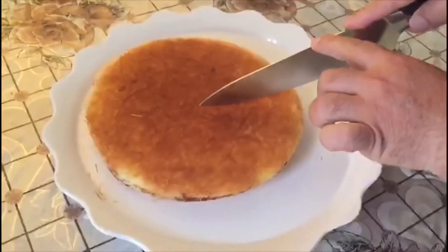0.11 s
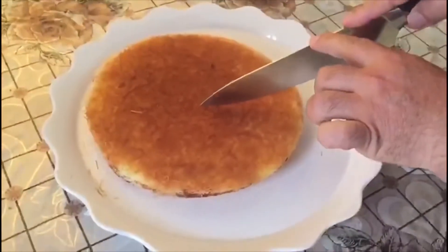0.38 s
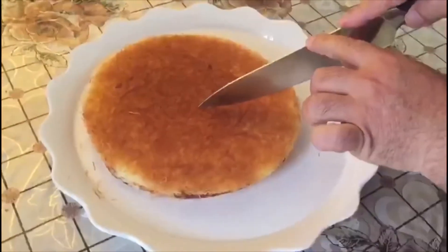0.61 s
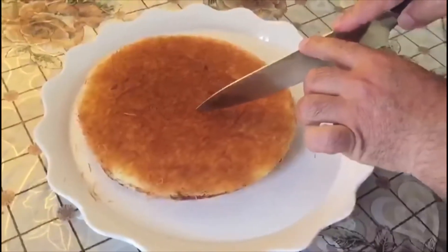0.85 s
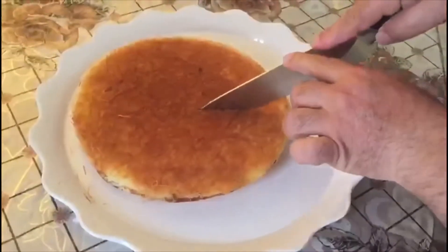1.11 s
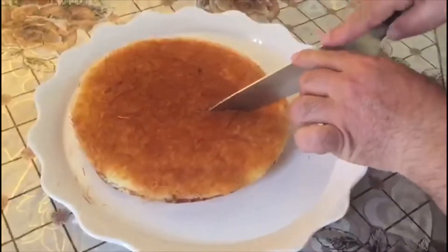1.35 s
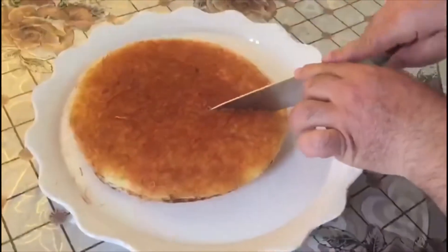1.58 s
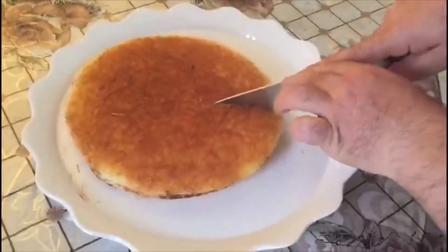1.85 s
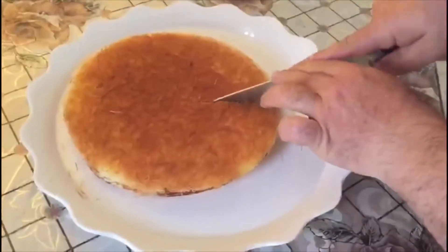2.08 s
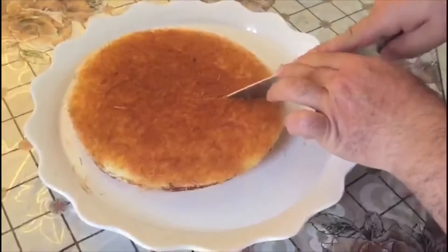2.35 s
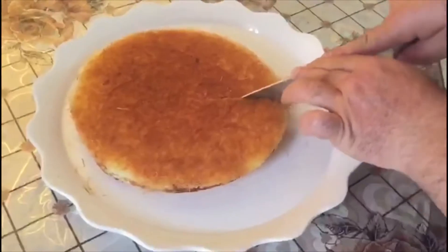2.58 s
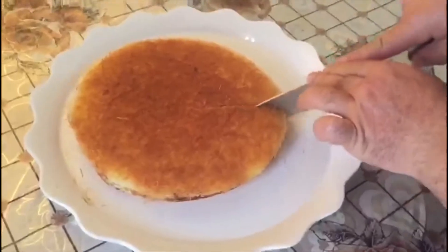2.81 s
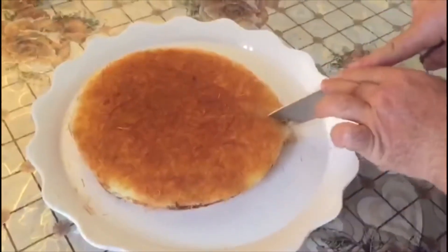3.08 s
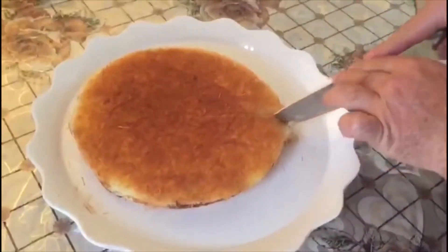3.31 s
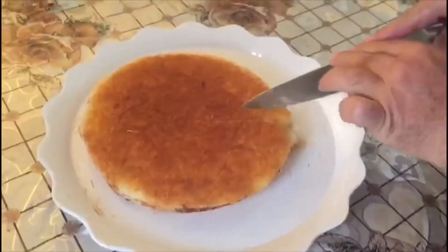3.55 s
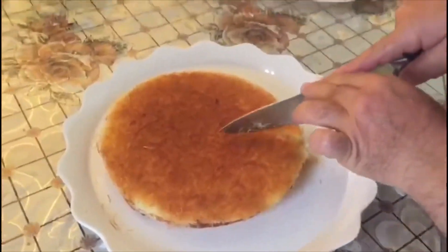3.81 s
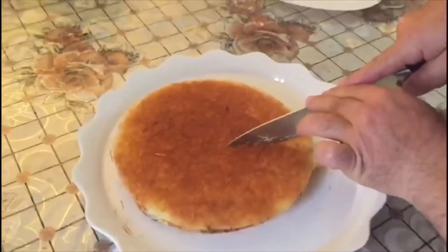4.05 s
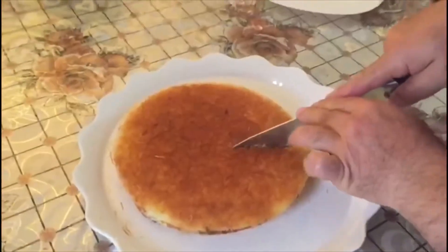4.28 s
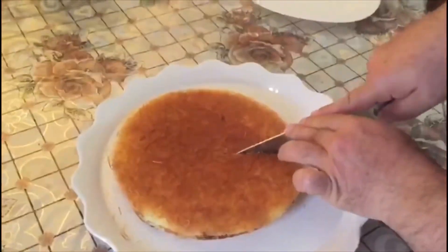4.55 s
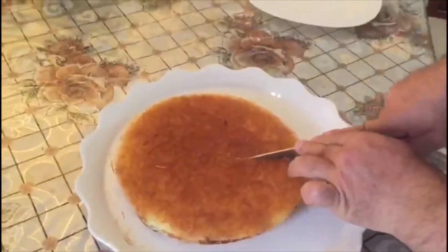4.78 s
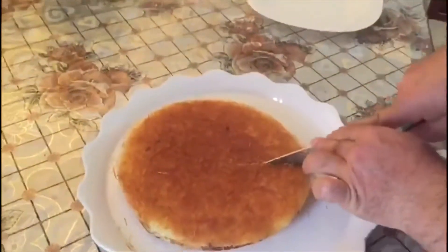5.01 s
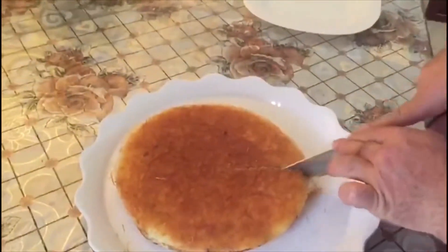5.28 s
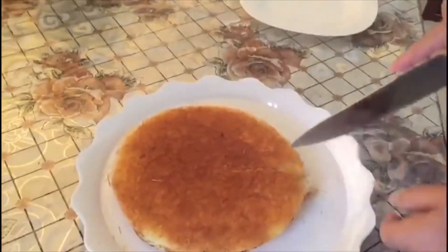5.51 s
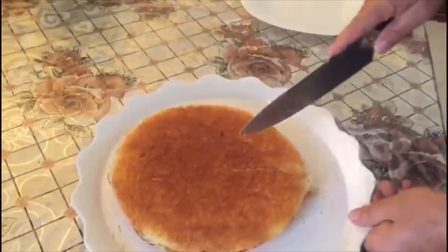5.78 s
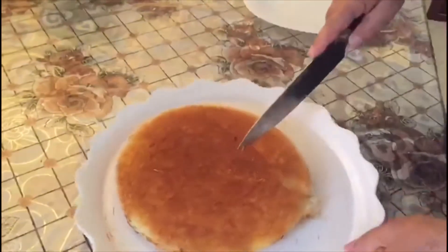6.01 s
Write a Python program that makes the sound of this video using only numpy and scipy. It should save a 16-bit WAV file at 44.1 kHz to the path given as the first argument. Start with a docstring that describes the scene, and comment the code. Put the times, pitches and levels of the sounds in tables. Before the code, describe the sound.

A phone held near a plate picks up a blade sawing brittle baked crust: sharp snaps first, then denser crunches, muffled as the blade sinks. A hard plate strike midway leads into scraping and heavy low bumps. It quiets, steel tinkles briefly, a stronger plate strike rings shortly in the room, sparse clicks follow, and the plate rubs across the tablecloth over faint air and low rumble.

```python
"""A crisp crust crackles and rings the blade as a kitchen knife saws through it on a ceramic plate.
Place: a quiet room with air noise, low rumble, a fading drone and a faint tone. Microphone: a phone, close by.
Noise bursts of fracture excite crust, blade, crumb and plate; light touches ring the free blade's modes.
The edge twice strikes the plate hard, as damped modes with wall echoes and a diffuse room tail.
The plate shifts, thuds and slides on the table, as shaped noise and short gliding tones."""
import sys
import numpy as np
from scipy import signal
from scipy.fft import rfft, irfft, next_fast_len
from scipy.io import wavfile
from scipy.ndimage import uniform_filter1d, map_coordinates

SR = 44100
rng = np.random.default_rng(int(sys.argv[2]) if len(sys.argv) > 2 else 0)


def master(y):
    """Save y as 16-bit WAV."""
    cut = np.clip(np.atleast_2d(y).T, -1, 1)
    pcm = np.round(cut * 32767)  # scale
    wavfile.write(sys.argv[1], SR, pcm.astype(np.int16))


def linear_from_db(decibels):
    """Turn decibels (scalar or array-like) into linear amplitude factors; 0 gives 1."""
    return 10 ** (np.asarray(decibels, float) / 20)


N = 270421  # length in samples

# Room air: (frequency [Hz], relative level [dB per Hz])
AIR_SPECTRUM = [(120, -24), (200, -1), (255, -6.5), (335, -9.5), (427, -14.5), (473, -15.5), (691, -14.5),
                (806, -16.5), (958, -15.5), (1870, -20), (5940, -27.5), (12200, -34.5), (15900, -79),
                (22000, -120)]
AIR_DB = -67  # mean level, before its slow drift
# Low rumble: (frequency [Hz], relative level [dB per Hz])
RUMBLE_SPECTRUM = [(55, -26.5), (78, 6), (120, 5), (200, -7), (280, -47.5)]
# Deep rumble: (frequency [Hz], relative level [dB per Hz])
DEEP_SPECTRUM = [(20, -37), (35, -14.5), (55, 7), (72, 1.5), (95, -45.5)]
# Both rumbles, before wavering: (time [s], rumble level [dB], deep rumble level [dB])
LOW_LEVELS = [(0, -66.5, -65), (.5, -60.5, -67), (1.0, -65.5, -71), (1.5, -63.5, -69), (2.1, -69, -69),
              (2.4, -63, -62), (3.05, -62, -54.5), (3.2, -57, -73), (3.5, -71, -59.5), (3.75, -68, -69.5),
              (4.4, -69.5, -71), (4.8, -65.5, -63), (5.1, -65.5, -73), (6.13, -65, -69.5)]
# A low drone fading away, level before wavering: (time [s], frequency [Hz], level [dB])
DRONE = [(0, 60.6, -62.5), (.2, 58.6, -53), (.55, 59.4, -65.5), (.85, 64, -60.5), (1.1, 66.2, -58),
         (1.4, 68, -72)]
# A faint tone, level before wavering: (time [s], frequency [Hz], level [dB])
FAINT_TONE = [(5.0, 745, -83.5), (5.26, 760, -80), (5.32, 764, -68.5), (5.37, 768, -82), (5.45, 778, -77),
              (5.57, 786, -78.5), (5.75, 800, -85.5)]
# Diffuse room: (frequency [Hz], t60 [s])
ROOM_DECAY = [(200, 0.68), (700, 0.86), (1400, 0.6), (2400, 0.46), (3500, .5), (5500, 0.4), (7500, 0.33),
              (10000, 0.6)]
# Early wall echoes, level within the room's answer: (delay [s], level [dB])
WALL_ECHOES = [(.009, -12), (0.0119, -12), (.022, -13.5), (.028, -25), (.036, -21.5), (.048, -27)]
# The plate rocks and the table booms: (time [s], thud level [dB], boom level [dB], decay [s])
THUDS = [(.97, -78, -54.5, 0.036), (1.31, -72, -59.5, 0.026), (1.84, -80, -56.5, 0.031),
         (2.341, -44, -65, 0.056), (2.47, -55.5, -47.5, 0.068), (2.76, -48, -57, 0.025),
         (2.91, -54, -51, 0.078), (3.04, -48, -41.5, 0.054), (3.088, -35, -44, 0.079),
         (3.27, -49, -43.5, 0.086), (3.39, -58, -55, 0.046), (3.46, -60.5, -58, .04),
         (4.59, -75, -50, 0.029), (4.95, -76, -53.5, .04)]
THUD_RISE_S = .03
# Rocking plate on the table: (frequency [Hz], relative level [dB per Hz])
ROCKING_SPECTRUM = [(35, -41.5), (60, -5), (81, -3.5), (204, -0.5), (259, 3.5), (303, -18.5), (385, -20.5),
                    (432, -32.5), (600, -23), (780, -47), (1320, -120)]
# Dull knocks: (time [s], level before onset and decay [dB], starting pitch [Hz], t60 [s], fall [octaves/s])
KNOCKS = [(0.574, -49.5, 532, 0.026, -3), (0.633, -41.5, 510, 0.025, -3), (0.808, -46, 550, 0.036, 10),
          (0.899, -36, 347, 0.036, 3), (2.7235, -41, 1230, 0.022, 1.5), (2.727, -44, 520, 0.14, 31),
          (2.9445, -35, 734, 0.016, 6), (3.031, -29, 187, .04, 9.5), (3.064, -24, 224, 0.03, 22),
          (3.097, -29, 201, 0.071, 1), (3.394, -51.5, 1760, 0.04, 1.5), (3.89, -54, 843, 0.0199, 0),
          (5.14, -51, 1743, 0.037, -5), (5.27, -50, 1290, 0.024, 7), (5.501, -48, 1290, .02, 3),
          (6.046, -53, 1180, 0.045, 3)]
# The plate slides on the cloth: (time [s], rub level [dB], rustle level [dB])
SLIDE = [(5.82, -84, -80), (5.86, -68.5, -74), (5.93, -61.5, -75), (5.955, -58.5, -58),
         (6.088, -53.5, -61.5), (6.13, -59, -62)]
# Rub of the sliding plate: (frequency [Hz], relative level [dB per Hz])
RUB_SPECTRUM = [(410, -36), (700, -6.5), (764, -35), (845, -16.5), (974, -14), (1110, -10), (2290, 1.5),
                (3500, -21), (4550, -60.5), (7700, -120)]
# Rustle of the cloth: (frequency [Hz], relative level [dB per Hz])
RUSTLE_SPECTRUM = [(1760, -47), (3000, -10), (3990, 2), (4830, -2.5), (5710, 3), (7500, -12.5),
                   (11200, -11.5), (12000, -18.5), (15600, -47.5), (22000, -120)]
# Light blade touches: (time [s], level [dB], nearness to the tip [0-1])
TOUCHES = [(3.969, -61, 0.9), (3.974, -52.5, 1), (3.985, -47, 0.73), (4.011, -49.5, 0.33)]
# Free steel blade: (frequency [Hz], level touched at belly [dB], level touched at tip [dB], t60 [s])
FREE_BLADE = [(1930, -6, -19.5, 0.13), (2390, -4.5, -18, 0.074), (3050, -13.5, -13, 0.036),
              (3410, -2, -9, 0.079), (6300, 8, -21, 0.044), (6790, -21, 0, 0.044), (7830, -11, -17, 0.033),
              (9040, -2, -12.5, 0.052), (8780, -16, -8, 0.025), (9600, 0, -13, 0.041),
              (10960, -15, -0.5, 0.024)]
# Edge on plate: (time [s], gain [dB], contact time [s], treble tilt [dB per octave], room level [dB])
BLOWS = [(2.3316, -8, 0.00055, 3, -3.5), (4.526, 1, 0.00094, 2.5, -4.5)]
# Plate damped by the pastry: (frequency [Hz], relative level [dB], t60 [s])
PLATE_MODES = [(273, -26, 0.11), (368, -29.5, 0.078), (675, -35, 0.082), (910, -8.5, 0.02),
               (1107, -17, 0.054), (1290, -0.5, 0.017), (1493, -3.5, 0.023), (1605, 3.5, 0.016),
               (1580, -21.5, 0.013), (2030, -17, 0.068), (2137, 1.5, 0.0084), (2533, -7.5, 0.014),
               (2754, -19, .025), (3740, -22.5, 0.012), (4480, -26.5, 0.02), (5194, -14.5, 0.015),
               (5270, -7.5, 0.01), (5650, -22, 0.034), (5870, -21, 0.021), (6990, -28.5, 0.017),
               (7078, -21, 0.013), (8400, -29.5, .01), (9770, -40, 0.042), (11400, -40.5, 0.009)]
# Pushes of the blade: (peak time [s], rise [s], fall [s], crust crackle [dB], scrape on the plate [dB])
STROKES = [(0.76, 0.04, 0.035, -57, -68.5), (0.9, 0.094, .05, -47, -62.5), (0.999, 0.088, 0.11, -48, -56),
           (1.27, 0.032, .08, -63, -94), (1.39, 0.035, 0.12, -53, -59), (1.5, 0.074, 0.056, -52, -60.5),
           (1.68, 0.092, 0.091, -68, -77), (1.82, 0.057, 0.041, -53, -70), (2.14, 0.027, .08, -58.5, -61.5),
           (2.225, 0.024, 0.048, -55.5, -51.5), (2.316, 0.038, 0.052, -46.5, -45),
           (2.49, 0.08, .02, -47.5, -53.5), (2.62, 0.057, .04, -55, -65), (2.675, 0.043, 0.029, -57, -50.5),
           (2.72, 0.036, 0.024, -55, -56), (2.844, 0.051, 0.078, -48, -49.5),
           (3.056, 0.078, 0.062, -52.5, -48), (3.3, 0.06, 0.03, -71, -60), (3.47, .025, 0.018, -67, -75),
           (4.33, 0.19, .06, -73.5, -77.5), (4.43, 0.045, 0.055, -63, -59), (4.517, 0.031, .01, -55.5, -44),
           (4.79, 0.11, 0.064, -77.5, -54), (4.96, 0.037, 0.038, -82.5, -61.5),
           (5.22, 0.24, 0.18, -77, -69.5), (5.357, 0.027, 0.021, -67.5, -67.5),
           (5.43, 0.059, 0.043, -75, -90)]
EDGE_DB, SQUARENESS = -12, 2  # level one rise or fall away from a stroke's peak; power of its flanks
UNEVEN_DB, UNEVEN_HZ = 1.7, 90  # the blade advances in jerks: depth, knots per second
# Single flakes snapping: (time [s], crack level [dB], plate knock level [dB])
SNAPS = [(0.5574, -55, -85), (0.574, -44, -87), (0.613, -49.5, -87), (0.6332, -40, -57), (0.7472, -42, -75),
         (0.811, -37, -80), (0.838, -49, -67), (0.8846, -46, -62), (0.898, -49, -46), (0.9548, -41.5, -67),
         (0.9743, -42.5, -70), (1.0203, -43, -67), (1.0853, -69, -52.5), (1.1621, -58.5, -86),
         (1.195, -66, -86), (1.3678, -50, -49), (1.398, -61, -50), (1.543, -51, -66), (1.812, -51, -66),
         (2.1407, -47, -53), (2.221, -50, -43), (2.6386, -51, -53), (2.726, -64, -51), (2.894, -56, -45),
         (2.945, -63, -58), (2.997, -56, -43), (3.0513, -43, -38.5), (3.245, -74, -58), (3.267, -78, -53),
         (3.3015, -57, -63), (3.36, -80, -62), (3.3937, -83, -61.5), (3.4702, -57.5, -79),
         (4.18, -65.5, -62.5), (4.418, -73, -59), (4.4306, -55, -51), (4.46, -62, -55),
         (4.77, -65.5, -42.5), (4.9662, -81.5, -52.5), (5.0519, -65.5, -77), (5.1466, -74, -62),
         (5.2504, -63.5, -63.5), (5.356, -65, -68), (5.5021, -85, -59.5), (5.955, -78, -65),
         (6.052, -63, -47.5)]
SNAP_RISE_S, SNAP_FALL_S = 0.0024, 0.005
# Crust crackle: (frequency [Hz], relative level [dB per Hz])
CRUST_SPECTRUM = [(180, -38), (300, 0.5), (350, -14.5), (961, -14.5), (1760, -6.5), (2630, -4.5), (3540, 0),
                  (4980, -5.5), (9850, -2.5), (11700, -5), (12200, -27.5), (15900, -61), (22000, -120)]
# Soft inside of the pastry: (frequency [Hz], relative level [dB per Hz])
CRUMB_SPECTRUM = [(200, -27), (320, -6), (550, 0), (850, 9), (1300, -37.5)]
# Blade gripped by the crust, before blade_colour() reshapes it: (frequency [Hz], width [Hz], level [dB])
GRIPPED_BLADE = [(2140, 72, -6.5), (2540, 83, -10.5), (3158, 20, 0.5), (3590, 97, -3.5), (4190, 70, -1.5),
                 (5420, 170, -7.5), (5640, 130, -13.5), (6080, 47, -6.5), (6300, 34, -14), (6900, 78, -6.5),
                 (7960, 160, -5), (9800, 280, -2.5), (11000, 390, -9.5), (11500, 39, -4.5)]
# Where the blade sits in the pastry; crumb is against the mean dB of crackle and scrape:
# (time [s], freedom to ring [dB], treble let out [dB], crumb level [dB])
BLADE_FREEDOM = [(.5, 6, 4, -10), (.8, -3, 3, -7), (.95, -11, 1.5, -7), (1.45, -11.5, 0, -5),
                 (1.9, -12, -2.5, -15), (2.2, -1, 1, -4), (2.5, -10.5, -2.5, -12), (2.85, -14, -6, -12.5),
                 (3.3, -14, 0, -5), (4.4, -16.5, 3.5, -8.5), (4.9, -17.5, -3, -5)]
# Dips of the microphone port: (frequency [Hz], half-width [Hz], depth [0-1])
PORT_DIPS = [(2860, 150, 0.1), (5070, 230, 0.4)]


def unit(x):
    """Scaled to rms 1."""
    return x / np.sqrt(np.mean(x ** 2) + 1e-20)


def along(points, hz):
    """(Hz, value) points read on a log frequency axis."""
    f, v = np.transpose(points)
    return np.interp(np.log(hz + 1), np.log(f + 1), v)


def curves(rows):
    """One value per sample for each column after the time."""
    s, *cols = np.transpose(rows)
    return [np.interp(np.arange(N) / SR, s, c) for c in cols]


def wobble(rate):
    """A smooth random curve, rate knots a second."""
    knots = rng.standard_normal(int(N * rate / SR) + 4)
    return map_coordinates(knots, [np.arange(N) * rate / SR])


def coloured(x, gain):
    """x through the causal minimum-phase filter whose gain against frequency is given."""
    m = 2 * next_fast_len(len(x) // 2 + 4096)
    cepstrum = irfft(np.log(gain(np.fft.rfftfreq(m, 1 / SR)) + 1e-6), m)
    cepstrum[1:m // 2] *= 2  # folding the cepstrum makes the filter causal
    cepstrum[m // 2 + 1:] = 0
    return irfft(rfft(x, m) * np.exp(rfft(cepstrum)), m)[:len(x)]


def noise(spectrum):
    """Steady noise of rms 1 with the given spectrum."""
    return unit(coloured(rng.standard_normal(N), lambda hz: linear_from_db(along(spectrum, hz))))


def tone(rows, blur):
    """A slightly unsteady sine along (s, Hz, dB) rows, silent outside them."""
    hz, db = curves(rows)
    s = np.arange(N) / SR
    phase = 2 * np.pi * np.cumsum(hz) / SR + blur * wobble(14)
    return np.sqrt(2) * linear_from_db(db) * np.sin(phase) * (s >= rows[0][0]) * (s < rows[-1][0])


def humps(peaks, hz):
    """Gain of (Hz, width, dB) resonances summed in power."""
    power = sum(linear_from_db(2 * db) * (hz * w) ** 2 / ((c * c - hz * hz) ** 2 + (hz * w) ** 2) for c, w, db in peaks)
    return np.sqrt(power)


def ring(modes, attack, scatter_db, tilt_db=0):
    """Damped modes after one contact, each at a new strength; neighbours start in opposite sense."""
    t = np.arange(SR // 2) / SR
    out = np.zeros(len(t))
    for k, (hz, db, t60) in enumerate(modes):
        strength_db = db + tilt_db * np.log2(hz / 1600) + scatter_db * rng.standard_normal()
        onset = 1 - np.exp(-(t * (hz / 2000) ** .6 / attack) ** 2)  # low bending waves arrive late
        out += (-1) ** k * linear_from_db(strength_db - 60 * t / t60) * np.sin(2 * np.pi * hz * t) * onset
    return out


def grains(rate, spread_db, hiss):
    """Random fractures with a few big ones, in clumps, over a fine hiss; rms 1."""
    chance, size, sign = rng.random(N), rng.exponential(size=N), rng.standard_normal(N)
    broken = chance < rate / SR * linear_from_db(3 * wobble(60))
    cracks = broken * sign * linear_from_db(spread_db * np.minimum(size, 3))
    return unit(unit(cracks) + hiss * rng.standard_normal(N))


def swells(peaks, rises, falls, levels_db, power, edge_db):
    """Gain of swells overlapping in energy; each alone is at edge_db one rise before or fall after its peak."""
    t = np.arange(N) / SR
    energy = np.zeros(N)
    for s, up, down, db in np.broadcast(peaks, rises, falls, levels_db):
        away = np.abs(t - s) / np.where(t < s, abs(up), abs(down))
        energy += linear_from_db(2 * (db + edge_db * away ** power))
    return np.sqrt(energy)


def patchy(x, depth_db):
    """Gives each patch of time and frequency its own level by a random gain field."""
    z = signal.stft(x, nperseg=256)[2]
    field = uniform_filter1d(rng.standard_normal(z.shape), size=2, axis=0)
    field = uniform_filter1d(field, size=14, axis=1)
    gain = linear_from_db(depth_db * unit(field))
    return signal.istft(z * unit(gain), nperseg=256)[1][:N]


def background():
    """Room air and wavering low rumble as shaped noise, a drone and a faint tone as unsteady sines."""
    rumble_db, deep_db = curves(LOW_LEVELS)
    rumble = linear_from_db(rumble_db + 1.7 * wobble(4.2)) * noise(RUMBLE_SPECTRUM)
    deep = linear_from_db(deep_db + 1.5 * wobble(5)) * noise(DEEP_SPECTRUM)
    air = linear_from_db(AIR_DB + .6 * wobble(1.1)) * noise(AIR_SPECTRUM)
    drone = linear_from_db(2.6 * wobble(9.35)) * tone(DRONE, blur=0.4)
    faint = linear_from_db(3.5 * wobble(28)) * tone(FAINT_TONE, blur=0.55)
    return air + rumble + deep + drone + faint


def tail():
    """Diffuse answer of the room, each frequency dying at its own speed; energy 1."""
    hz, t, z = signal.stft(rng.standard_normal(SR), SR, nperseg=256)
    decay = linear_from_db(-60 * t / along(ROOM_DECAY, hz)[:, None])
    h = signal.istft(z * decay, SR, nperseg=256)[1][:SR]
    h = h * (1 - np.exp(-np.arange(SR) / SR / .012))  # gradual build-up
    return h / np.linalg.norm(h)


def thuds():
    """The plate rocks in grainy noise and the table booms in low noise, each jolt a swell."""
    grainy = grains(rate=1200, spread_db=2.0, hiss=1.0)
    rocking = unit(coloured(grainy, lambda hz: linear_from_db(along(ROCKING_SPECTRUM, hz))))
    s, thud_db, boom_db, decay = np.transpose(THUDS)

    def jolt(db):
        """Swells whose flanks lose one neper per rise or decay time."""
        return swells(s, THUD_RISE_S, decay, db, 0.94, -20 / np.log(10))

    return jolt(thud_db) * rocking + jolt(boom_db) * noise(RUMBLE_SPECTRUM)


def knocks():
    """Dull knocks: damped sines of gliding pitch."""
    out, t = np.zeros(N + SR), np.arange(SR // 8) / SR
    for s, db, hz, t60, fall in KNOCKS:
        phase = 2 * np.pi * np.cumsum(hz * 2 ** (-fall * t)) / SR
        onset = 1 - np.exp(-t / 0.0012)
        out[round(s * SR):][:len(t)] += linear_from_db(db - 60 * t / t60) * onset * np.sin(phase)
    return out[:N]


def slide():
    """The plate slides on the cloth: rub and rustle as patchy shaped noise."""
    rub_db, rustle_db = curves([(5.65, -95, -95), *SLIDE])
    rub = linear_from_db(rub_db) * noise(RUB_SPECTRUM)
    rustle = linear_from_db(rustle_db) * noise(RUSTLE_SPECTRUM)
    return patchy(rub + rustle, depth_db=1.0)


def touches():
    """Light touches, a few milliseconds of chatter each, leave the free blade ringing."""
    out, t = np.zeros(N + SR), np.arange(SR // 40) / SR
    for s, db, tip in TOUCHES:
        chatter = rng.standard_normal(len(t)) * np.exp(-t / 0.0054)
        modes = [(f, belly + tip * (point - belly), t60) for f, belly, point, t60 in FREE_BLADE]
        steel = ring(modes, .0005, 1.43)
        sound = signal.fftconvolve(steel, chatter / np.linalg.norm(chatter))
        out[round(s * SR):][:len(sound)] += linear_from_db(db) * sound
    return out[:N]


def blows():
    """The edge strikes the plate, ringing its modes over a gritty crack; walls and room repeat the ring."""
    out, t = np.zeros(N + 2 * SR), np.arange(SR // 2) / SR
    walls = np.zeros(SR)
    walls[[round(d * SR) for d, _ in WALL_ECHOES]] = [linear_from_db(g) for _, g in WALL_ECHOES]
    for s, db, contact, tilt_db, room_db in BLOWS:
        grit = coloured(rng.standard_normal(len(t)), lambda hz: 1 / (1 + (hz / 6000) ** 2))
        crack = 0.12 * linear_from_db(-60 * t / 0.04) * (1 - np.exp(-t / contact)) * grit
        hit = ring(PLATE_MODES, contact, 0.19, tilt_db) + crack
        wet = signal.fftconvolve(hit, linear_from_db(room_db) * (walls + linear_from_db(-6.5) * tail()))
        out[round(s * SR):][:len(hit)] += linear_from_db(db) * hit
        out[round(s * SR):][:len(wet)] += linear_from_db(db) * wet
    return out[:N]


def crust_colour(hz):
    """Broad crackle of the crust."""
    return linear_from_db(along(CRUST_SPECTRUM, hz))


def crumb_colour(hz):
    """Soft inside of the pastry."""
    return linear_from_db(along(CRUMB_SPECTRUM, hz))


def plate_colour(hz):
    """The plate's modes as resonances, broadened by the rubbing contact."""
    return humps([(f, 3 / max(t60, .02) + 60, db) for f, db, t60 in PLATE_MODES], hz)


def blade_colour(hz):
    """Resonances of the gripped blade, none narrower than 110 Hz, their summed gain then sharpened."""
    return humps([(f, max(w, 110), db) for f, w, db in GRIPPED_BLADE], hz) ** 1.3


def snap_gain(levels):
    """One short envelope for each snap: a swell to the peak, then a decay."""
    out, t = np.zeros(N + SR), np.arange(-SR // 100, SR // 20) / SR
    shape = np.where(t < 0, np.exp(-(t / SNAP_RISE_S) ** 2), np.exp(-abs(t) / SNAP_FALL_S))
    for (s, *_), db in zip(SNAPS, levels):
        out[round(s * SR) - SR // 100:][:len(t)] += linear_from_db(db) * shape
    return out[:N]


def knife():
    """The same fractures excite the crust, the gripped blade, the crumb and the plate, each at its own level."""
    peak, rise, fall, crackle_db, scrape_db = np.transpose(STROKES)
    _, snap_db, knock_db = np.transpose(SNAPS)
    ring_db, treble_db, crumb_db = curves(BLADE_FREEDOM)
    breaks = grains(rate=4000, spread_db=4, hiss=.9)
    puff = rng.standard_normal(N)

    def push(db):
        """Uneven swells of the strokes."""
        return swells(peak, rise, fall, db, SQUARENESS, EDGE_DB) * linear_from_db(UNEVEN_DB * wobble(UNEVEN_HZ))

    def through(x, colour):
        """x through a filter scaled to pass white noise at unchanged level."""
        return coloured(x, colour) / np.std(coloured(puff, colour))

    fracture = push(crackle_db) * breaks + snap_gain(snap_db) * puff
    treble = coloured(fracture, lambda hz: 1 / np.sqrt(1 + (5500 / (hz + 1)) ** 6))
    fracture = fracture + (linear_from_db(treble_db) - 1) * treble  # a deeper blade is muffled
    freedom = linear_from_db(ring_db)
    share = 1 / np.sqrt(1 + freedom ** 2)  # energy in the blade is taken from the crackle
    crust = through(share * fracture, crust_colour)
    plate = through(push(scrape_db) * breaks + snap_gain(knock_db) * puff, plate_colour)
    crumb = through(push((crackle_db + scrape_db) / 2) * linear_from_db(crumb_db) * breaks, crumb_colour)
    blade = through(share * freedom * fracture, blade_colour)
    return patchy(crust + plate + crumb, depth_db=2.2) + blade


def scene():
    """Knife and plate in the room; the blows bring their own room answer, thuds and background have none."""
    near = knife() + touches() + knocks() + slide()
    room = linear_from_db(-12.0) * signal.fftconvolve(near, tail())[:N]
    return (near + room + thuds() + blows() + background())[None]


def top_cut(x):
    """Nothing passes above the cut-off."""
    return signal.sosfilt(signal.butter(12, 12390, fs=SR, output="sos"), x)


def record(dry):
    """Phone microphone: the port has narrow dips, the highest peaks round off and the treble ends steeply."""

    def port_gain(hz):
        """Product of the port's dips."""
        return np.prod([1 - np.clip(d, 0, .9) / (1 + ((hz - f) / w) ** 2) for f, w, d in PORT_DIPS], axis=0)

    port = coloured(dry[0], port_gain)
    soft = port / (1 + np.abs(port / .9) ** 6) ** (1 / 6)
    finished = coloured(soft, lambda hz: 1 / (1 + (hz / 11950) ** 40))[None]
    return top_cut(finished)


dry = scene()
out = record(dry)
master(out)
```